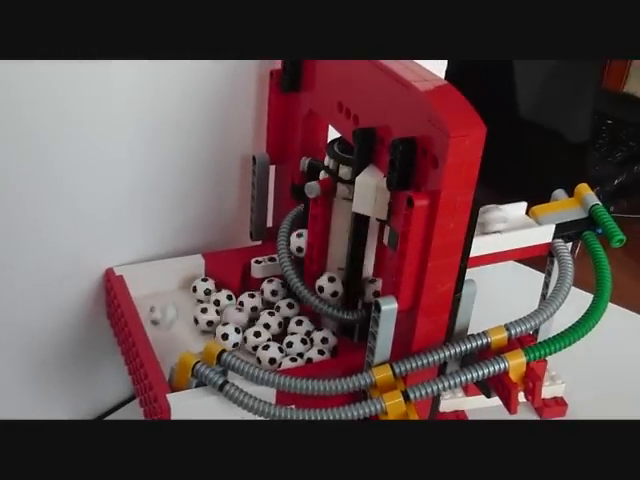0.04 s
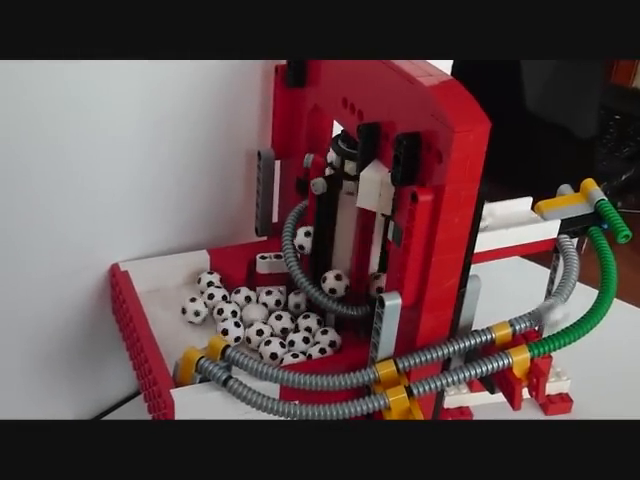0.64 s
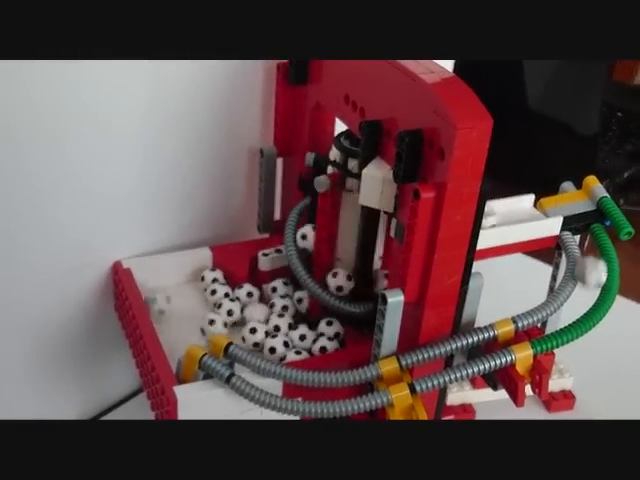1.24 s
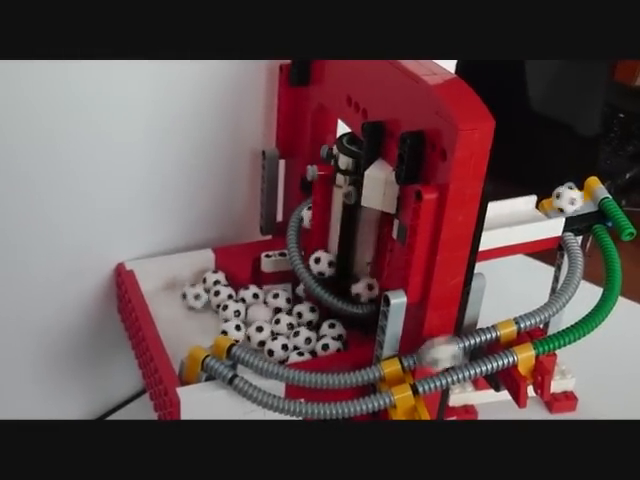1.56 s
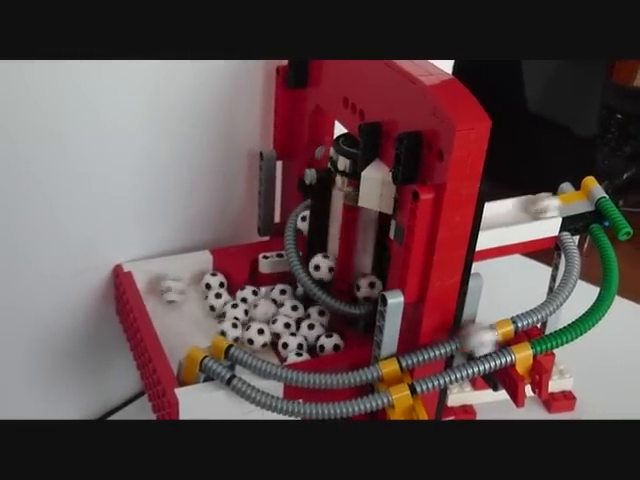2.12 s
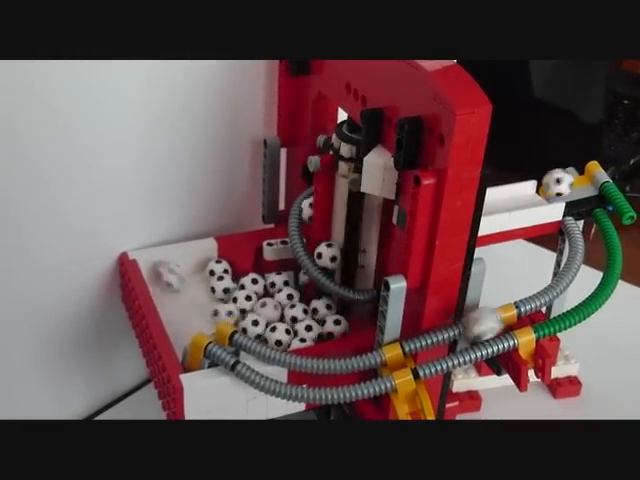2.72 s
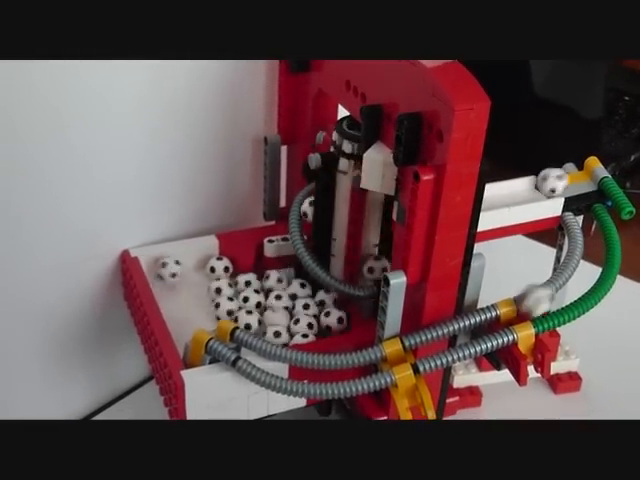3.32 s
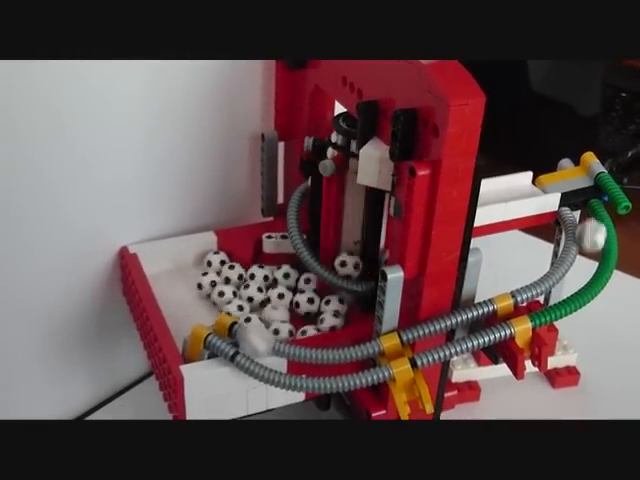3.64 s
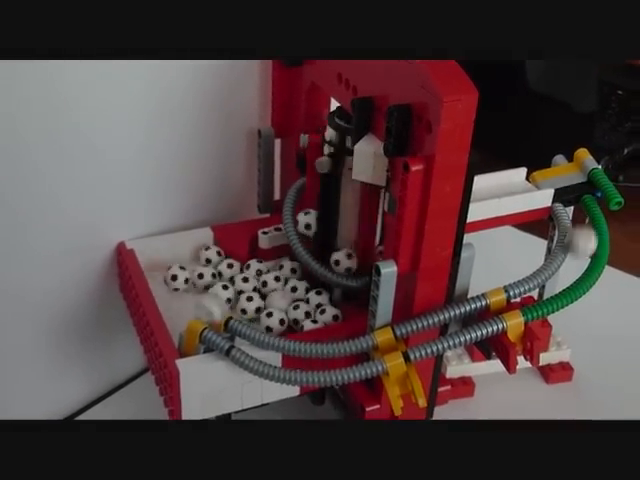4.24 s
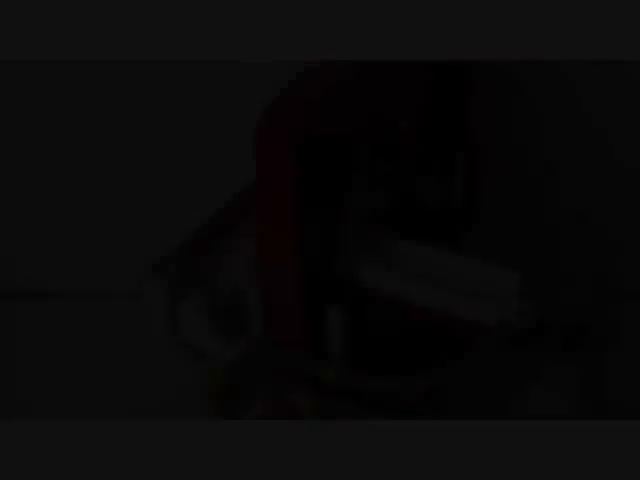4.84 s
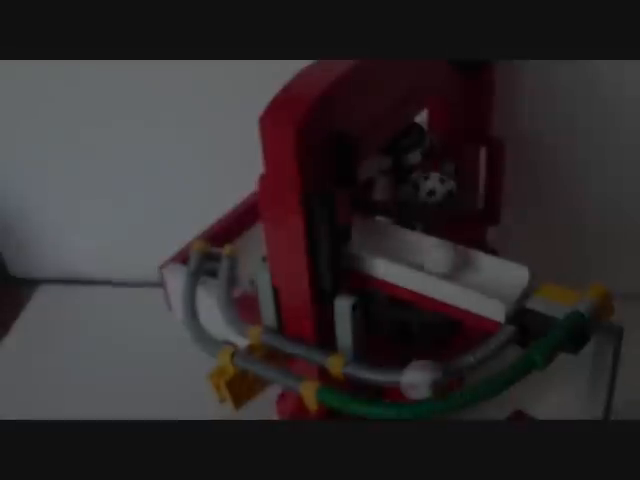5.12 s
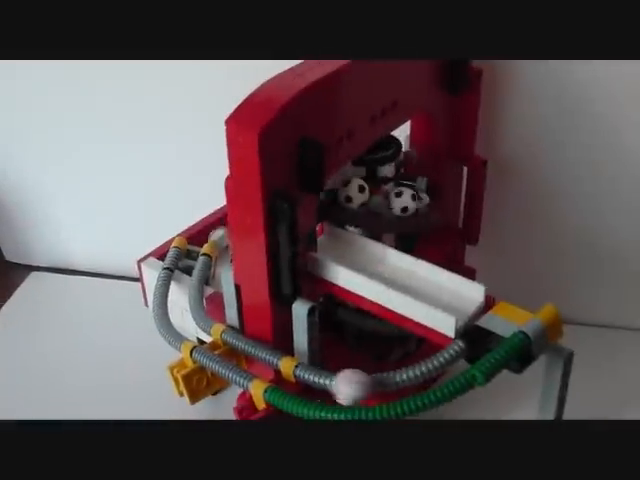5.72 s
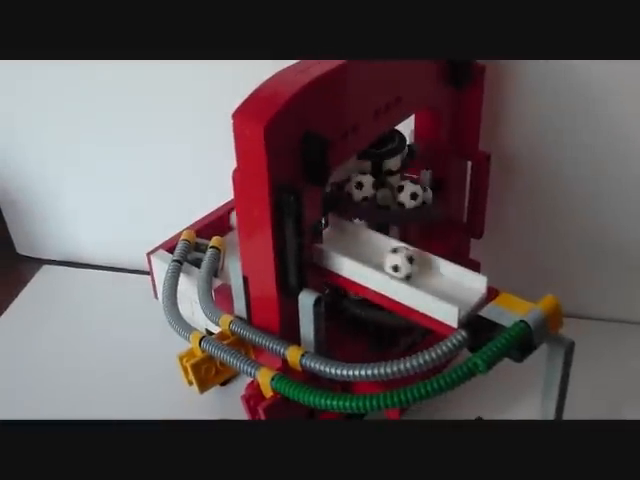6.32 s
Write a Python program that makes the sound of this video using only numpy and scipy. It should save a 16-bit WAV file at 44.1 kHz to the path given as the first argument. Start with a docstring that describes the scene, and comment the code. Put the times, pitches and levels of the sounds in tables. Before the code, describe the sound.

Sharp plastic cracks and quick rattling bounces repeat as small balls fall from a lift, run down a chute and clack against rails and a tray. Beneath them, the toy machine's gears whir, tick and rumble on a table in a small room. The single-microphone sound fades out briefly late on, then fades back in from another side as two more balls drop.

```python
"""Sharp plastic cracks and quickening bounces: small balls drop from the lift of a motor-driven brick
machine onto a hollow chute, roll, and knock into the turn of a ribbed rail and the tray. Under them the
gears whir, the motor whines and the frame rumbles. The machine stands on a table in a small room,
heard through one microphone. The sound fades to silence at 4.94 s and comes back, heard from the side."""
import sys
import numpy as np
from scipy import signal
from scipy.fft import rfft, irfft, next_fast_len
from scipy.io import wavfile
from scipy.ndimage import map_coordinates

SR = 44100
rng = np.random.default_rng(int(sys.argv[2]) if len(sys.argv) > 2 else 0)


def unload_wav(signal):
    """Save mono or channel-first audio to the path in sys.argv[1] as 16-bit WAV at rate SR, clipped to [-1, 1]."""
    wavfile.write(
        sys.argv[1],
        SR,
        np.round(np.clip(np.atleast_2d(signal).T, -1, 1) * 32767).astype(np.int16),
    )


N = 280917
TIME = np.arange(N) / SR
RING_TIME = np.arange(SR // 2) / SR
SIDE_FROM_S = 4.94  # the microphone is in front until this moment, then at the side

# the lift lets a ball fall on the chute: start_s, release_db, fall_s, hit_db, boom_db
BALL_DROPS = [(0.066, -1, .0965, -4, -25), (1.228, 0, .093, -1, -15), (1.96, .5, .094, -1, -17),
              (2.581, .5, .096, -2, -17), (3.192, -.5, .096, -4.5, -21), (3.871, -1, .098, -6.5, -22),
              (4.402, -1.5, .099, -5, -19), (5.798, -3, .083, -8, -25), (6.219, -5, .148, -3.5, -23)]
# runs of bounces down the chute: start_s, first_db, first_flight_s
BOUNCE_RUNS = [(0.288, -11, .036), (1.44, -5.5, .0365), (2.177, -8.5, .0362), (2.792, -12, .0348),
               (3.419, -10, .038), (4.083, -9, .0375), (4.551, -7.5, .042), (5.937, -10, .0445)]
# modes of the hollow chute: pitch_hz, level_db, t60_s
CHUTE_MODES = [(880, -14, 0.026), (1172, -16.5, 0.051), (1696, -12, 0.014), (1923, 1, 0.011),
               (2240, 0.5, 0.011), (2530, 2.5, 0.0084), (2920, -5, 0.0068)]
# spectrum of bricks cracking together: frequency_hz, level_db
CRACK_SPECTRUM = [(30, -35), (100, -15.5), (550, -17.5), (950, -9.5), (1500, -8.5), (2700, -16), (4000, -5),
                  (5500, -5), (7200, -3), (10000, -15.5), (14000, -23), (16000, -15.5)]
# spectrum of loose parts clacking: frequency_hz, level_db
CLACK_SPECTRUM = [(100, -22.5), (550, -25), (900, -8.5), (1500, -10.5), (2000, -4.5), (3000, -5.5),
                  (4200, -9.5), (5600, -12), (8000, -14.5), (15000, -19)]


def drops(release_hollow_db=-20, hit_hollow_db=-9.5, boom_rise_s=0.2):
    """Release and hit each crack the bricks over the chute's hollow note; the table booms faintly."""
    # modes of the bricks and of the table: pitch_hz, level_db, t60_s
    brick_modes = [(3450, -13.5, 0.014), (3915, -9.5, 0.017), (4210, -7.5, 0.012), (5186, -0.5, 0.0094),
                   (5610, 0, 0.011), (5910, -3.5, 0.0086), (6840, -13, 0.023), (8700, -10.5, 0.0055)]
    table_modes = [(80, 0, .6), (177, -14, .25), (274, -14, .2)]
    out = np.zeros(N)
    for start, release_db, fall_s, hit_db, boom_db in BALL_DROPS:
        contacts = (start, release_db, release_hollow_db), (start + fall_s, hit_db, hit_hollow_db)
        for s, db, hollow_db in contacts:
            crack = amp(-6) * burst(CRACK_SPECTRUM, t60=0.0047) + amp(-5) * ring(brick_modes)
            hollow = amp(hollow_db) * ring(CHUTE_MODES)
            add(out, s + 0.001203, amp(db) * (crack + hollow))
        boom = ring(table_modes, size=22000)
        swell = 1 - np.exp(-RING_TIME[:len(boom)] / boom_rise_s)
        add(out, start, amp(boom_db) * boom * swell)
    return out


def bounces(count=7, loss_db=1.58, flight_shrink=.28):
    """A ball lands in the chute and bounces down it, each flight shorter and each contact softer."""
    # clacks on the chute's floor or wall: start_s, level_db
    landings = [(0.182, -17), (0.238, -1.5), (1.373, -2), (1.393, -5.5), (2.112, -.5), (2.129, -5.5),
                (2.745, -2), (3.357, -2.5), (3.369, -3), (4.031, -4), (4.057, -6), (4.479, -6), (5.9, -7.5),
                (6.031, -7.5)]
    out, bounce = np.zeros(N), np.arange(count)
    for s, db in landings:
        add(out, s + .0007, chute_tap(s, db, hollow_db=-9, ping_db=-15.5))
    for start, first_db, first_flight_s in BOUNCE_RUNS:
        flights = first_flight_s / (1 + flight_shrink * bounce)
        times = start + np.cumsum(flights) - flights
        for s, db in zip(times, first_db - loss_db * bounce):
            add(out, s + 0.00101, chute_tap(s, db, hollow_db=-8, ping_db=-12))
    return out


def chute_tap(s, db, hollow_db, ping_db, side_ping_db=-4):
    """The chute rings, the ball pings, hard blows crack. At the side the frame shields the ping."""
    # modes of the chute, brighter from the side, and of a ball: pitch_hz, level_db, t60_s
    chute_side_modes = [(1510, -32, 0.012), (2610, 0, 0.0052), (3440, -14, 0.013), (3900, -10.5, 0.01),
                        (4800, -12, 0.014)]
    ball_modes = [(5620, -5.5, 0.01), (6200, -12.5, 0.009), (8920, -17, 0.014)]
    # spectrum of the contact: frequency_hz, level_db
    snap_spectrum = [(30, -26.5), (100, -22), (600, -8.5), (1500, 0.5), (4000, 5.5), (7000, -3),
                     (11000, -0.5), (16000, -16.5)]
    at_side = s > SIDE_FROM_S
    hollow = amp(hollow_db) * ring(chute_side_modes if at_side else CHUTE_MODES)
    scatter_db = 5 * rng.standard_normal()  # varies with the point of contact
    ping = amp(ping_db + side_ping_db * at_side + scatter_db) * ring(ball_modes)
    crack = amp(-5.5 + 0.84 * db) * burst(snap_spectrum, t60=0.011)
    return amp(db) * (hollow + ping + crack)


def knocks(rebound_s=.044, rebound_db=-10.5):
    """Loose parts chatter as a ball runs into the frame, rebounds and touches it again."""
    # knocks at the turn or in the tray: start_s, level_db
    frame_hits = [(0.104, -14), (0.542, -9.5), (0.738, -20), (1.169, -8), (1.745, -13.5), (1.797, -7.5),
                  (2.396, -6), (2.662, -13), (3.025, -8), (3.644, -9.5), (4.258, -10), (4.394, -17.5),
                  (4.894, -10), (4.987, -12), (5.18, -20.5), (5.277, -15), (5.79, -7.5), (6.262, -13.5),
                  (6.361, -7.5)]
    # modes of the frame: pitch_hz, level_db, t60_s
    frame_modes = [(776.3, -15.5, 0.29), (928, -23.5, 0.17), (1441, -5, 0.061), (1870, -4, 0.061),
                   (2387, 6, 0.016), (2730, 10, 0.013), (3670, 6, 0.013)]
    out = np.zeros(N)
    for s, db in frame_hits:
        for delay, touch_db in (0, 0), (rebound_s, rebound_db):
            clack = amp(-5.5) * burst(CLACK_SPECTRUM, t60=0.034)
            crack = amp(-11) * burst(CRACK_SPECTRUM, t60=0.015)
            frame = amp(-5.5) * ring(frame_modes)
            add(out, s + delay + .0005, amp(db + touch_db) * (clack + crack + frame))
    return out


def machine(motor_hz=461.8, side_whir_db=-6.5, side_rumble_db=-4.5):
    """The running drive whirs over a low rumble; at the side the frame shields the gears."""
    # level of the running machine: time_s, level_db
    running_level = [(0.0, -30.5), (0.8, -29.5), (1.4, -28), (2.45, -28), (3.0, -30.5), (3.6, -29.5),
                     (4.9, -27.5)]
    run_db = np.interp(TIME, *np.transpose(running_level))
    at_side = TIME > SIDE_FROM_S
    speed_hz = motor_hz * (1 + .004 * wobble(4.4) + 0.00504 * wobble(35))
    turns = np.cumsum(speed_hz) / SR
    whir = gears(turns) + amp(-13) * motor_whine(turns) + amp(-10.5) * slack_ticks()
    rumble = amp(-17) * rail_rumble()
    return amp(run_db) * (amp(side_whir_db * at_side) * whir + amp(side_rumble_db * at_side) * rumble)


def gears(turns, unload_db=-3, unload_s=0.088):
    """Teeth tick and rub in a ringing housing, quieter for a moment as the lift lets go of a ball."""
    # spectrum of rubbing teeth: frequency_hz, level_db
    rub_spectrum = [(290, -31), (500, -18.5), (1090, -10.5), (1350, -6.5), (1500, -8), (1860, -5.5),
                    (2030, -15), (2380, -9), (3890, -7), (4430, -5.5), (8010, -11), (12000, -12),
                    (15800, -21)]
    # housing resonances from the front and from the side: pitch_hz, width_hz, level_db
    housing_front = [(1400, 70, -5), (1860, 45, 0), (2330, 40, -3), (2730, 80, -2), (3260, 55, -2),
                     (4470, 150, 1.5), (4900, 120, -5), (5350, 220, -6), (6820, 200, -6), (11800, 600, -9)]
    housing_side = [(1421, 32, -0.5), (1925, 41, -1), (2760, 74, -2.5), (4100, 26, -8), (5650, 140, -12),
                    (6270, 1500, -11), (8140, 270, -20.5), (11960, 480, -12.5)]
    teeth = grains(rate=6000) * (1 + np.cos(2 * np.pi * turns) / 3)
    rub = amp(-2.5) * unit(colour(teeth + 0.93 * rng.standard_normal(N), rub_spectrum))
    ticks = grains(rate=3000)
    front = amp(-8) * unit(resonate(ticks, housing_front))
    side = amp(-2) * unit(resonate(ticks, housing_side))
    housing = np.where(TIME < SIDE_FROM_S, front, side)
    unloaded = sum(np.interp((TIME - s) / unload_s, [0, 1 / 9, 2 / 3, 1], [0, 1, 1, 0])
                   for s, *_ in BALL_DROPS)
    flutter_db = 0.58 * wobble(60) + 1.2 * wobble(10)
    return amp(unload_db * unloaded + flutter_db) * (rub + housing)


def slack_ticks():
    """Slack links and jostling balls add stray ticks."""
    return unit(signal.fftconvolve(grains(rate=32), burst(CLACK_SPECTRUM, t60=0.024))[:N])


def motor_whine(turns):
    """The motor sings at multiples of its rotation, each wavering in level."""
    # motor harmonics: multiple, level_db
    harmonics = [(2, -3), (3, -3.5), (4, 1.5), (5, 4), (6, -6), (7, 3), (9, -4.5)]
    return unit(sum(amp(db + 0.95 * wobble(9.5)) * np.sin(2 * np.pi * (round(k) * turns + rng.random()))
                    for k, db in harmonics))


def rail_rumble():
    """The frame and ribbed rails rumble unevenly."""
    # spectrum of the rumble: frequency_hz, level_db
    rumble_spectrum = [(20, -9), (45, -20.5), (78, -3.5), (110, -9.5), (150, -5), (176, 3.5), (215, -6.5),
                       (275, 2.5), (345, -8.5), (400, -2), (650, -23), (1200, -36)]
    return amp(1.8 * wobble(12)) * unit(colour(rng.standard_normal(N), rumble_spectrum, size=8192))


def rolling(below_bounce_db=42, peak_after_s=0.12, swell_s=0.099):
    """As the bounces die, the rolling ball keeps the chute's modes alive with tiny taps."""
    level = sum(amp(db - below_bounce_db) * np.exp(-((TIME - s - peak_after_s) / swell_s) ** 2)
                for s, db, _ in BOUNCE_RUNS)
    return level * unit(signal.fftconvolve(grains(rate=1300), ring(CHUTE_MODES))[:N])


def room(x, t60, wet_db):
    """The table and close walls return quick echoes, then a short diffuse tail."""
    # echoes off nearby surfaces: delay_s, level_db
    reflections = [(.0023, -17), (.0052, -22), (0.0145, -23.5), (0.0176, -50)]
    out = x.copy()
    for delay, db in reflections:
        add(out, delay, amp(db) * x)
    envelope = amp(-60 * RING_TIME / t60) * (1 - np.exp(-RING_TIME / 0.0012))
    tail = rng.standard_normal(len(RING_TIME)) * envelope
    tail = colour(tail, [(200, 5.5), (4000, 1.5), (8000, -9.5), (15000, -3.5)])
    return out + amp(wet_db) * signal.fftconvolve(x, tail / np.linalg.norm(tail))[:N]


def ring(modes, size=3000):
    """Struck modes, with new strengths and slight detuning for each point of contact."""
    t = RING_TIME[:size]
    hz, db, t60 = np.transpose(modes)[:, :, None]
    hz = hz * (1 + .006 * rng.standard_normal(hz.shape))
    db = db + 1.8 * rng.standard_normal(db.shape)
    signs = (-1) ** np.arange(len(modes))
    return unit_blow(signs @ (amp(db - 60 * t / t60) * np.sin(2 * np.pi * hz * t)))


def burst(spectrum, t60, size=3000, rise_s=.0007):
    """The brief noise of a contact, evened out across frequency, then coloured by the spectrum."""
    t = RING_TIME[:size]
    envelope = amp(-60 * t / t60) * (1 - np.exp(-t / rise_s))
    bins = rfft(rng.standard_normal(size) * envelope)
    even = irfft(bins / (np.abs(bins) + 1e-12), size) * envelope ** 0.037
    return unit_blow(colour(even, spectrum))


def grains(rate):
    """Tiny contacts of uneven size at random moments, about rate a second."""
    return unit((rng.random(N) < rate / SR) * rng.uniform(-0.89, 1, N))


def wobble(rate):
    """A smooth random curve, rate knots a second."""
    return map_coordinates(rng.standard_normal(int(N * rate / SR) + 4), [TIME * rate])


def resonate(x, peaks):
    """Pass x through parallel resonances."""
    return filtered(x, lambda f: sum(amp(db) * 1j * f * width / (hz * hz - f * f + 1j * f * width)
                                     for hz, width, db in peaks))


def colour(x, points, size=2048):
    """Minimum-phase filter through (frequency_hz, level_db) points."""
    hz, db = np.transpose(points)
    gain_db = np.interp(np.log(np.fft.rfftfreq(size, 1 / SR) + 1), np.log(hz), db)
    cepstrum = irfft(np.log(amp(gain_db)))
    cepstrum[1:size // 2] *= 2
    cepstrum[size // 2 + 1:] = 0
    return signal.fftconvolve(x, irfft(np.exp(rfft(cepstrum))))[:len(x)]


def filtered(x, response):
    """Apply a complex frequency response."""
    size = next_fast_len(len(x) + 4096, True)
    return irfft(rfft(x, size) * response(np.fft.rfftfreq(size, 1 / SR)), size)[:len(x)]


def amp(db):
    """Decibels to gain."""
    return 10 ** (np.asarray(db) / 20)


def unit(x):
    """Scale to rms 1."""
    return x / np.sqrt(np.mean(x ** 2) + 1e-20)


def unit_blow(x):
    """Scale to the energy of one millisecond at rms 1."""
    return x / np.sqrt(np.sum(x ** 2) * 1000 / SR)


def add(track, s, sound):
    """Mix a sound in at time s."""
    part = track[max(round(s * SR), 0):][:len(sound)]
    part += sound[:len(part)]


def scene():
    """Ball impacts in the small room over the rolling and the machine, the same in both channels."""
    impacts = drops() + bounces() + knocks()
    mono = room(impacts, t60=0.15, wet_db=-10) + rolling() + machine()
    return np.array([mono, mono])


def record(dry, notch_hz=7850, fade_s=1.93, top_hz=15800):
    """The microphone has a narrow notch; loud cracks clip, the level fades out and in, the top is cut."""
    notched = filtered(dry[0], lambda hz: 1 - np.exp(-((hz - notch_hz) / 70) ** 2))
    fade = np.clip(np.abs(TIME - SIDE_FROM_S) / fade_s, 0, 1)
    mono = filtered(fade * np.clip(notched, -1, 1), lambda hz: hz < top_hz)
    return np.array([mono, mono])


dry = scene()
out = record(dry)
unload_wav(out)
```